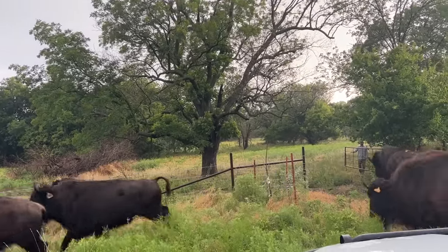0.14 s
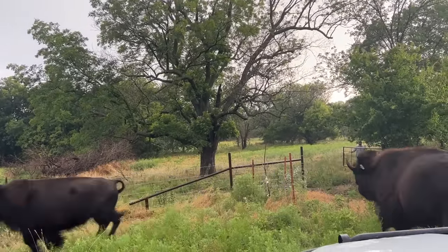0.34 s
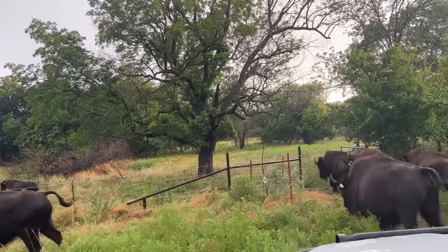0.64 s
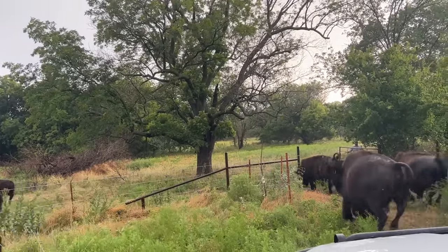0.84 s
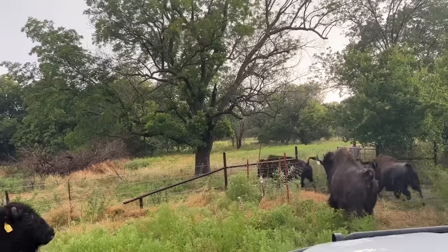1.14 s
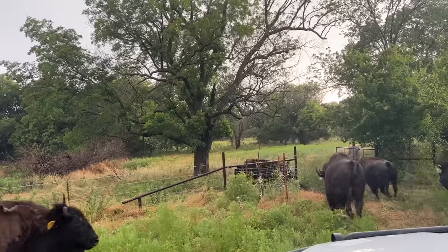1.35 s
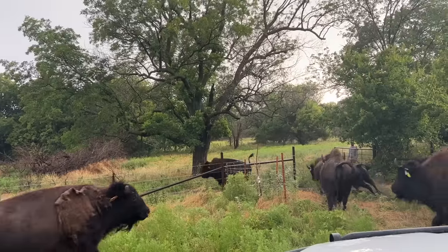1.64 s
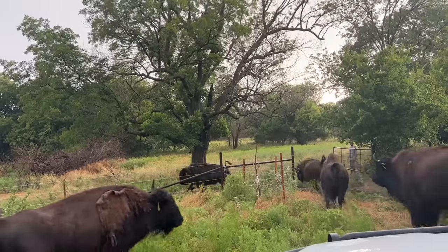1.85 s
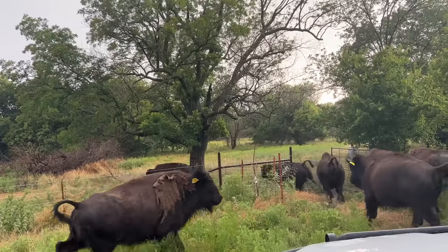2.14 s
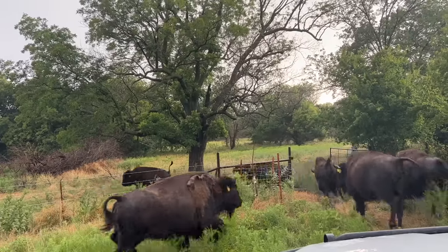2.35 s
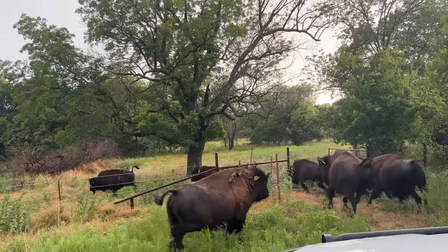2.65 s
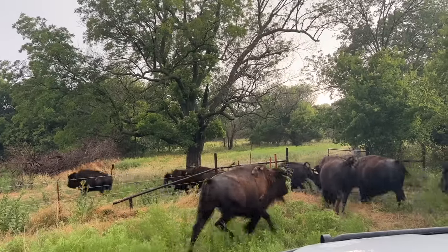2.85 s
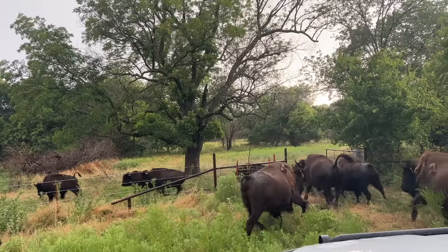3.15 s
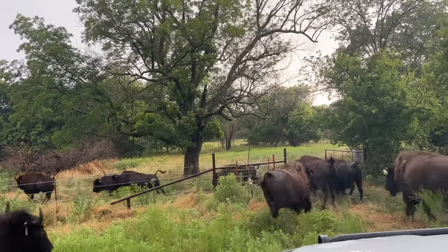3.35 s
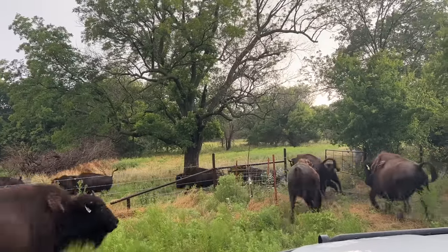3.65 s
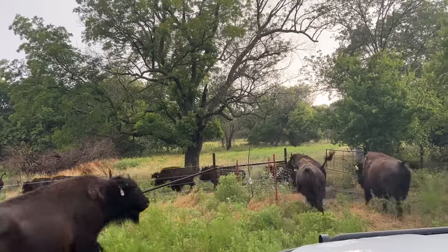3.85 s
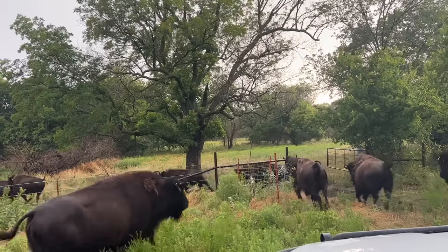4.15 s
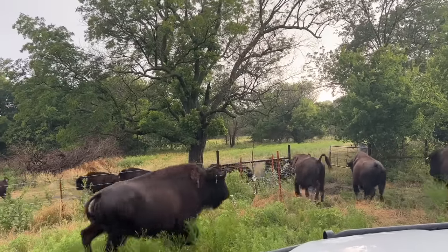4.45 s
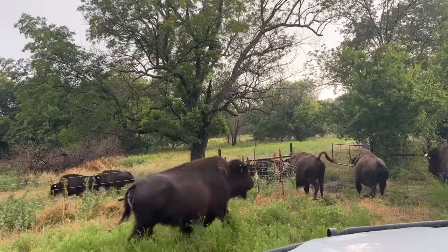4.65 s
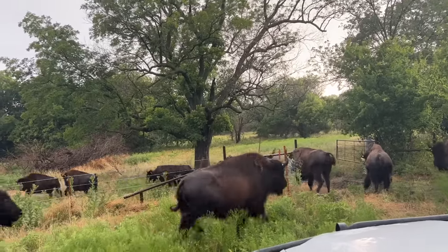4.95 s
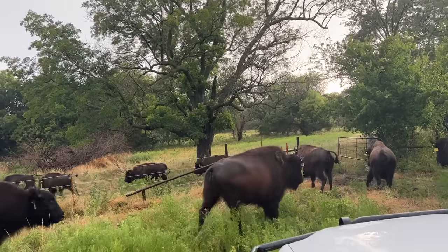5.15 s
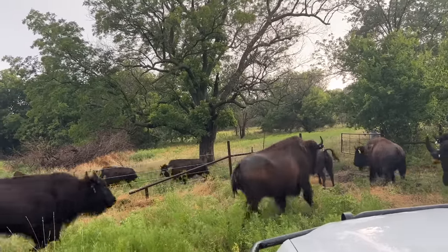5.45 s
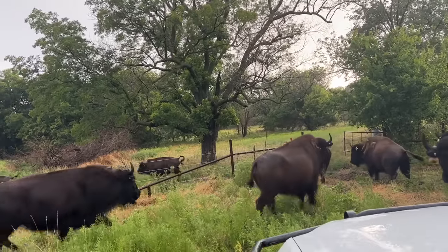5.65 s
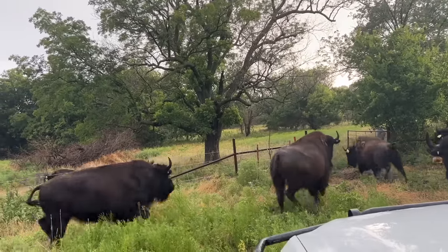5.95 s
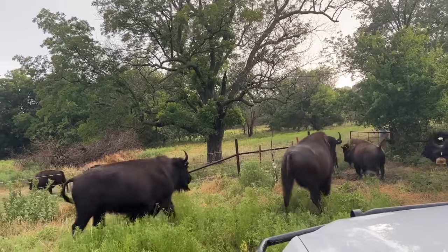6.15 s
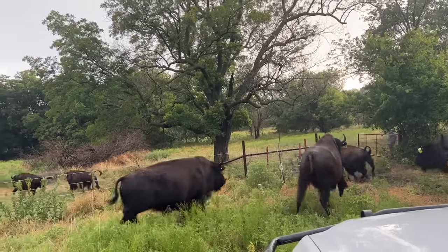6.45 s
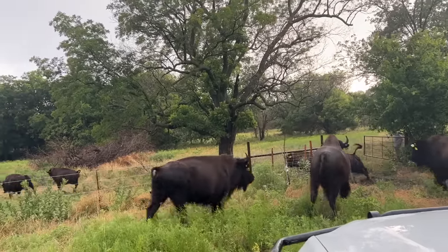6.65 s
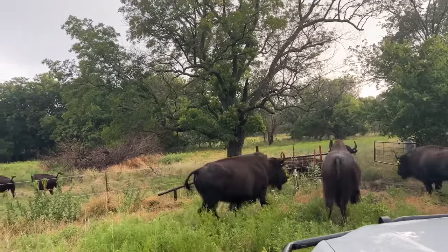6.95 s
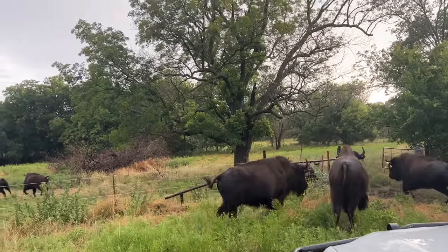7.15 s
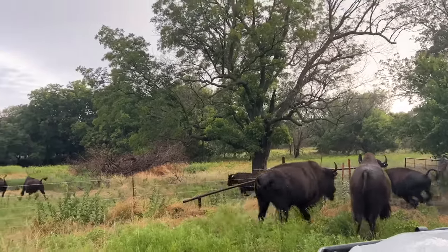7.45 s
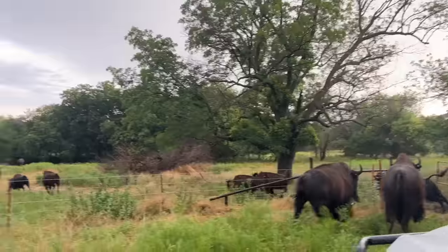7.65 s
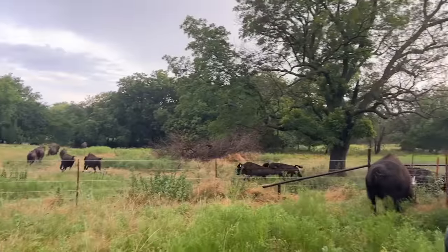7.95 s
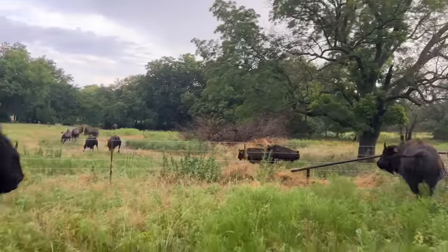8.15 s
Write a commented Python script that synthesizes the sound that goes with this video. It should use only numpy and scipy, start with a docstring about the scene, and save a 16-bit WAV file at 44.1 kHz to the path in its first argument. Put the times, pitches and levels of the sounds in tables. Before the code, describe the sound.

A truck idles throughout with a slightly wavering low hum and rumble, heard from the cab in an open pasture. Around it a bison herd trots through tall grass: fine hissing rustle, crunching dry litter, dull blurred footfalls. A short, rattling, throaty grunt comes almost at once, at 0.1 seconds, and a deeper one at about 1.0, amid soft low thumps like wind or handling. Small ticks and stalk snaps scatter around 1.5 to 2.7. At 3.1 a stronger, more open, raspy grunt lasts 0.4 seconds. A faint, higher one follows at 4.2, then a heavy thump at 4.6. The last grunt, at 5.4, swells and closes into a dull growl among thumps. Two barely audible bird whistles occur at 5.1 and 5.9. Movement thins around 6, with thumps near 6.5; from 7.2 tread and rumble grow closer, with rustles and knocks until 8.3.

```python
"""Five bison grunts, trains of throat pulses ringing a resonant throat, heard from an idling truck's cab.
The herd trots through tall grass: noise for the tread and trampled litter, short noise bursts for
snapping stalks, knocks, swishes and one grunt's rough onset, and a hiss for the grass. Low thumps,
perhaps wind or handling at the microphone, are tones sinking in pitch.
Behind are the engine, wavering idle orders in low rumble, and a bird's two faint gliding whistles."""
import sys
import numpy as np
from scipy import signal
from scipy.fft import rfft, irfft
from scipy.io import wavfile

SR = 44100
rng = np.random.default_rng(int(sys.argv[2]) if len(sys.argv) > 2 else 0)


def dump(signal):
    """Clip the signal to [-1, 1] and save it as 16-bit WAV at the path in sys.argv[1]."""
    limited = np.clip(np.atleast_2d(signal).T, -1, 1)
    pcm = np.round(limited * 32767).astype(np.int16)
    wavfile.write(sys.argv[1], SR, pcm)


N = 366030
T = np.arange(N) / SR
HZ = np.fft.rfftfreq(N, 1 / SR)


def amp(db):
    """Decibels to gain."""
    return 10 ** (np.asarray(db) / 20)


def unit(x):
    """Scales to rms 1."""
    return x / np.sqrt(np.mean(x ** 2) + 1e-20)


def read(points, hz):
    """Joins spectrum points by straight lines on a log-frequency axis."""
    f, value = np.transpose(points)
    return np.interp(np.log(hz + 1), np.log(f), value)


def add(mix, start_s, sound):
    """Mixes a sound in at start_s, cut at the end of the mix."""
    part = mix[..., max(round(start_s * SR), 0):][..., :sound.shape[-1]]
    part += sound[..., :part.shape[-1]]


def drift(rate_hz):
    """Noise low-passed at rate_hz, rms 1: a slow random wander."""
    lowpass = 1 / (1 + (HZ / rate_hz) ** 4)
    return unit(irfft(rfft(rng.standard_normal(N)) * lowpass, N))


def band(x, centre_hz, octaves):
    """Pass band, Gaussian in log frequency."""
    f = np.fft.rfftfreq(x.shape[-1], 1 / SR)
    bell = np.exp(-.5 * (np.log2((f + 1) / centre_hz) / octaves) ** 2)
    return irfft(rfft(x) * bell, x.shape[-1])


def crackle(per_s, range_db, decay_s):
    """Tiny noise bursts at random moments; exponential chance scatters their levels in dB."""
    level_db = range_db * np.minimum(rng.exponential(1, N), 4)
    size = amp(level_db) * (rng.random(N) < per_s / SR)
    power = signal.lfilter([1], [1, -np.exp(-2 / (decay_s * SR))], size ** 2)
    return unit(np.sqrt(power) * rng.standard_normal((2, N)))


# left-right likeness of the microphone pair: f/Hz, correlation [0..1]
LIKENESS_SPECTRUM = [(60, .48), (130, .42), (220, .72), (330, .74), (600, .25), (1200, .2), (4000, .25),
                     (7000, .35), (8800, .97), (9500, 1), (16000, 1)]


def spread(pair, colour_db=0, side_db=0):
    """Colours two unrelated signals and blends them to the pair's likeness; side_db is L-R."""
    a, b = rfft(pair)
    same = np.clip(read(LIKENESS_SPECTRUM, HZ), 0, 1)
    left = a * amp(side_db / 2)
    right = (same * a + np.sqrt(1 - same ** 2) * b) * amp(-side_db / 2)
    return irfft(np.array([left, right]) * amp(colour_db), N)


# part of the left port's lead present at each frequency: f/Hz, share [0..1]
LEAD_SHARE_SPECTRUM = [(250, 0), (700, 1), (1500, 1), (3500, 0)]


def from_outside(x, lead_turns, body_db, top_db):
    """Sound entering the cab reaches the two ports out of step and unequally loud (R-L dB)."""
    f = np.fft.rfftfreq(x.shape[-1], 1 / SR)
    side = np.array([[-.5], [.5]])
    right_db = read([(200, 0), (700, body_db), (1300, top_db), (4000, 0)], f)
    turns = lead_turns * read(LEAD_SHARE_SPECTRUM, f)
    return irfft(rfft(x) * amp(side * right_db) * np.exp(-2j * np.pi * side * turns), x.shape[-1])


# far whistles: t/s, length/s, peak level/dB, start f/Hz, end f/Hz
BIRD_WHISTLES = [(5.125, 0.094, -52, 3160, 3060), (5.942, .09, -51, 1970, 2150)]


def bird():
    """Thin whistles: sines gliding linearly in pitch."""
    out = np.zeros(N)
    for start_s, length_s, db, start_hz, end_hz in BIRD_WHISTLES:
        pitch_hz = np.linspace(start_hz, end_hz, round(length_s * SR))
        tone = np.sin(2 * np.pi * np.cumsum(pitch_hz) / SR)
        add(out, start_s, amp(db) * signal.windows.tukey(len(tone), .6) * tone)
    return out


APPROACH_S, APPROACH_DB_PER_S = 7.22, 5


def approach():
    """Growing gain of tread and rumble as one animal walks up to the truck."""
    return amp(APPROACH_DB_PER_S * np.maximum(T - APPROACH_S, 0))


CYCLE_HZ = 7.625  # four-stroke cycle
# idle lines: multiple of CYCLE_HZ, mean sine amplitude/dB
ENGINE_ORDERS = [(8, -34), (10, -31.5), (11, -39), (12, -38.5), (14, -39), (22, -39.5), (30, -52.5)]
# rumble colour: f/Hz, relative level/dB
RUMBLE_SPECTRUM = [(15, -40), (30, -15.5), (45, -2.5), (62, -3.5), (85, 0.5), (112, -10), (160, -8.5),
                   (200, -13), (300, -17.5), (450, -27), (800, -42), (2000, -63)]


def engine(wander=0.00339, waver_db=0.54, rumble_db=-30.0, swell_db=2.0, fade_db_per_s=0.11,
           throb=0.061, port_turns=0.021):
    """Wavering idle orders in a bed of low rumble that throbs once a crankshaft turn."""
    cycles = np.cumsum(CYCLE_HZ * (1 + wander * drift(1.57))) / SR
    lag = np.array([[0], [port_turns]])  # the cab's sound field puts the ports out of step
    lines = np.zeros((2, N))
    for order, db in ENGINE_ORDERS:
        level = amp(db + waver_db * drift(12.0))
        lines += level * np.sin(2 * np.pi * (order * cycles + rng.random() + lag))
    rumble = unit(spread(rng.standard_normal((2, N)), read(RUMBLE_SPECTRUM, HZ)))
    level_db = rumble_db - fade_db_per_s * T + swell_db * drift(3.1)
    crank_throb = 1 + throb * np.sin(4 * np.pi * cycles)  # two crank turns a cycle
    return lines + amp(level_db) * approach() * rumble * crank_throb


# low thumps: t/s, envelope peak level/dB, start f/Hz, rise to peak/s, left port lead/turns
LOW_THUMPS = [(0.128, -21.5, 213, 0.036, 0), (0.388, -19.5, 200, 0.022, 0),
              (0.881, -19.5, 330, 0.014, -.05), (0.907, -8, 200, 0.012, -.11),
              (1.079, -14.5, 140, 0.01, 0.0022), (1.225, -14, 165, 0.012, -0.0027),
              (1.584, -13, 180, 0.011, -.08), (1.63, -15, 120, 0.012, -0.025),
              (1.675, -22.5, 240, 0.022, 0), (1.868, -18, 191, 0.027, -0.07),
              (2.42, -23, 190, 0.032, -0.052), (2.525, -19.5, 130, .012, -0.058),
              (2.645, -17.5, 188, 0.01, 0.13), (2.68, -19.5, 198, .01, 0.026),
              (3.331, -18.5, 120, 0.015, 0), (4.616, -8.5, 142, 0.008, -.09), (5.427, -17.5, 156, 0.014, 0),
              (5.483, -12, 207, 0.011, 0.13), (5.584, -13.5, 160, 0.016, -0.025),
              (5.638, -10.5, 140, 0.0083, -0.045), (6.436, -10, 171, 0.02, -0.18),
              (6.515, -12.5, 171, 0.01, 0.35), (6.6, -20.5, 240, 0.014, 0), (6.664, -14, 199, 0.021, -0.17),
              (6.74, -21, 252, 0.0056, -0.037), (7.241, -23, 225, 0.021, 0), (7.72, -24, 203, 0.019, 0),
              (7.94, -19, 198, 0.017, 0), (8.112, -15, 140, 0.0074, 0.23), (8.243, -14, 267, 0.0098, 0),
              (8.279, -27, 486, 0.0098, 0)]


def thumps(sag=0.25, sag_s=0.013, shudder_db=-18.0, shudder_hz=48, shudder_octaves=0.48, shudder_s=0.029):
    """Low thumps, perhaps wind or handling: tones sinking toward sag times start pitch, plus a shudder."""
    out, shake, t = np.zeros((2, N)), np.zeros(N), T[:SR // 5]
    for at_s, db, hz, rise_s, lead_turns in LOW_THUMPS:
        pitch_hz = hz * (sag + (1 - sag) * np.exp(-t / sag_s))
        swell = (t / rise_s * np.exp(1 - t / rise_s)) ** 2
        turns = np.cumsum(pitch_hz) / SR + lead_turns * np.array([[.5], [-.5]])
        add(out, at_s, amp(db) * swell * np.sin(2 * np.pi * turns))
        add(shake, at_s, amp(db + shudder_db) * t / shudder_s * np.exp(1 - t / shudder_s))
    deep = unit(spread(band(rng.standard_normal((2, N)), shudder_hz, shudder_octaves)))
    return out + shake * deep


STRIDE_HZ, STRIDE_AT_S = 2.81, 4.98
# herd bustle, thinning to one steady walker before more animals come:
# t/s, rustle level/dB before grass() gain, trampling level/dB before trampling() gain,
# crispness of rustle top/dB, swell per stride/dB (negative: dip)
HERD_BUSTLE = [(0, -45.5, -46, 1, 1.5), (2.35, -45.5, -45.5, 0.5, -1.6), (2.65, -46.5, -43.5, 2, .5),
               (3.2, -47.5, -45.5, -0.5, 1.2), (4.3, -46.5, -47, 1, 0.5), (5.2, -49, -49.5, -0.5, 1.5),
               (5.75, -49, -49.5, -1, 0.5), (6.3, -50, -48.5, -1.5, 0.5), (7, -48, -48, -1, -0.5),
               (7.6, -46, -47.5, 1, 1), (8.3, -48, -45, 2.5, -2.3)]


def herd_level(column, stride_share):
    """Gain from the bustle of the herd, swelling or dipping at each stride."""
    rows = np.array(HERD_BUSTLE)
    stride = np.cos(2 * np.pi * STRIDE_HZ * (T - STRIDE_AT_S))
    stride_db = np.interp(T, rows[:, 0], rows[:, 4]) * stride
    return amp(np.interp(T, rows[:, 0], rows[:, column]) + stride_share * stride_db)


# rustle colour: f/Hz, relative level/dB
RUSTLE_SPECTRUM = [(500, -20), (2000, -6), (3500, -3), (5000, -1.5), (6500, -1.5), (8000, -1.5),
                   (10000, -2), (11300, -1), (13000, -4), (16000, -5)]
# grass and stalk balance: f/Hz, L-R level/dB
GRASS_BALANCE = [(1500, 0), (4400, 4.5), (6000, 4.5), (8000, 2), (9200, 0)]
# top of the rustle: f/Hz, share taken by the crispness gain [0..1]
CRISP_SPECTRUM = [(6500, 0), (12000, 1)]


def grass(gain_db=6, grain=0.52, flicker_db=1.6):
    """Blades brush passing bodies: a fine hiss with tiny ticks and a top of varying crispness."""
    ticks = crackle(per_s=190, range_db=-0.5, decay_s=0.00095)
    hiss = rng.standard_normal((2, N)) + grain * ticks
    hiss = unit(spread(hiss, read(RUSTLE_SPECTRUM, HZ), read(GRASS_BALANCE, HZ)))
    top = irfft(rfft(hiss) * read(CRISP_SPECTRUM, HZ), N)
    rows = np.array(HERD_BUSTLE)
    crisp_db = np.interp(T, rows[:, 0], rows[:, 3])
    hiss = hiss - top + top * amp(crisp_db)
    return amp(gain_db + flicker_db * drift(17.8)) * herd_level(column=1, stride_share=1) * hiss


# litter colour: f/Hz, relative level/dB
TRAMPLE_SPECTRUM = [(150, -41), (400, -0.5), (650, 7.5), (900, 5), (1400, 2.5), (2500, 0.5), (4000, -10.5),
                    (8000, -9.5), (16000, -9.5)]


def trampling(gain_db=4, grain=0.76, flicker_db=1.36, lead_turns=0.18, right_db=3):
    """Hooves crush dry litter: a noise wash with small crunches in it."""
    crunches = crackle(per_s=90, range_db=2.0, decay_s=0.0041)
    wash = rng.standard_normal((2, N)) + grain * crunches
    wash = unit(spread(wash, read(TRAMPLE_SPECTRUM, HZ)))
    wash = from_outside(wash, lead_turns, right_db, 0)
    return amp(gain_db + flicker_db * drift(12.5)) * herd_level(column=2, stride_share=0.15) * wash


# patter swells: spread in time, level against the thump or swish
PATTER_SWELL_S, THUMP_PATTER_DB, SWISH_PATTER_DB = 0.14, -38.5, -4.5


def tread(floor_db=-45.0, centre_hz=430, octaves=1.0):
    """Footfalls blur into a dull noise patter on soil, louder around each low thump and swish."""
    patter = rng.standard_normal((2, N)) + 0.54 * crackle(per_s=21, range_db=3.5, decay_s=0.018)
    swells = [(at_s, db + THUMP_PATTER_DB) for at_s, db, *_ in LOW_THUMPS]
    swells += [(mid_s, db + SWISH_PATTER_DB) for mid_s, _, db, *_ in LEG_SWISHES]
    power = amp(floor_db) ** 2
    for at_s, db in swells:
        power = power + amp(db) ** 2 * np.exp(-((T - at_s) / PATTER_SWELL_S) ** 2)
    return np.sqrt(power) * approach() * unit(spread(band(patter, centre_hz, octaves)))


# short noise bursts: stalk snaps, knocks, and the rough onset of the third grunt:
# t/s, peak level/dB before spread(), centre f/Hz, width/octaves, decay/s
NOISE_BURSTS = [(1.542, -23.5, 6000, 1, 0.026), (1.697, -19.5, 620, 0.8, 0.0051),
                (2.035, -26, 1750, 0.71, 0.0044), (2.061, -29, 2800, 0.5, .004),
                (2.116, -21, 2500, 0.18, 0.0033), (2.133, -22.5, 1140, 0.64, 0.0054),
                (2.179, -14.5, 11000, 0.34, .0013), (2.260, -10, 10500, 0.38, 0.001),
                (2.497, -26.5, 2200, 0.68, 0.0099), (2.557, -27, 1500, 0.8, 0.0033),
                (2.668, -26, 1900, .6, .005), (3.072, -26.5, 1900, 0.64, 0.0034),
                (3.084, -22, 1200, 0.76, .002), (3.16, -17.5, 1800, 0.51, 0.0037),
                (3.449, -22, 11000, 0.81, .005), (3.483, -21, 10000, 0.3, .01),
                (3.678, -16.5, 6500, 1, 0.0037), (3.694, -14, 3800, .62, 0.0009),
                (3.86, -19.5, 8000, 0.47, .002), (4.228, -20, 5670, 0.96, 0.0051),
                (4.287, -26, 10000, 1, 0.059), (5.631, -33, 4900, 0.14, 0.0027),
                (7.071, -19, 8000, 0.68, 0.0022), (7.168, -27, 13500, .3, .002),
                (7.232, -25, 4340, 0.28, 0.0072), (7.236, -17.5, 9000, 1, 0.005),
                (8.063, -19.5, 7950, 1, 0.03), (8.239, -26, 660, 0.35, 0.011), (8.238, -24, 4500, 1, 0.018),
                (8.277, -17.5, 500, 0.28, 0.018), (8.275, -23, 4000, 1, 0.0071)]
# legs through grass: middle t/s, length/s, rms level/dB before fades and spread(), centre f/Hz, width/octaves
LEG_SWISHES = [(0.301, 0.2, -45, 5500, 0.55), (0.503, 0.18, -41, 5270, 0.64),
               (3.624, 0.083, -39, 5800, 0.31), (3.665, 0.11, -46, 4300, 0.71),
               (4.272, 0.2, -41, 6500, 0.82), (5.37, .1, -47, 4200, 0.27), (5.928, 0.059, -44.5, 6000, .12),
               (6.564, 0.36, -47, 5860, 0.38), (6.885, 0.23, -48, 5970, 0.35), (7.25, .13, -47, 5200, 0.46),
               (7.51, 0.12, -44, 6250, 0.38), (7.701, 0.34, -46, 6600, 0.46)]


def bursts_and_swishes():
    """Band-passed noise: decaying bursts for snaps, knocks and a grunt's onset; longer leg swishes."""
    out = np.zeros((2, N))
    t = T[:SR // 10] - .005  # lead-in for the filter's pre-ring
    for at_s, db, hz, octaves, decay_s in NOISE_BURSTS:
        envelope = np.exp(-abs(t) / decay_s) * (t > 0)
        burst = band(rng.standard_normal((2, len(t))) * envelope, hz, octaves)
        add(out, at_s + t[0], amp(db) * burst / abs(burst).max())
    for mid_s, length_s, db, hz, octaves in LEG_SWISHES:
        noise = unit(band(rng.standard_normal((2, SR)), hz, octaves))
        swish = noise[:, :round(length_s * SR)]
        add(out, mid_s - length_s / 2, amp(db) * swish * signal.windows.tukey(swish.shape[1], .7))
    return spread(out, side_db=read(GRASS_BALANCE, HZ))


def throat(modes, size=4096):
    """Minimum-phase (causal) ring of one pulse in a throat with steep resonances, peak 1."""
    f = abs(np.fft.fftfreq(size, 1 / SR))
    gain = sum(amp(db) / (1 + (1.56 * (f - hz) / width) ** 2) ** 2 for hz, width, db in modes)
    log_gain = np.log(gain + amp(-46))
    ring = np.fft.ifft(np.exp(np.conj(signal.hilbert(log_gain)))).real[:size // 2]
    return ring / abs(ring).max()


SPLIT_HZ = 950  # throat's body below, top above
RASP, START_RASP, START_S, CLOSURE_S = .022, .04, .05, .003  # air share, extra at onset, its decay, pulse decay
HISS, HISS_HZ, HISS_OCTAVES, HISS_S = .13, 4800, .45, .004  # share, centre, width, decay
AIRFLOW_DB = -44  # air between pulses, against effort
# chest boom under every grunt: f/Hz, width/Hz, level/dB
CHEST_MODE = (135, 150, 4)


def grunt(rows, modes, uneven_db=0.6, wobble=0.006, damping=0.1):
    """Slack vocal folds slap; each slap and its rasp of air ring a throat that keeps changing shape."""
    s, rate_hz, effort_db, mouth_db, stretch, limp_db = np.transpose(rows)
    t = np.arange(s[0], s[-1] + 0.042, 1 / SR)
    turns = np.cumsum(np.interp(t, s, rate_hz)) / SR
    slaps_s = t[(np.diff(np.floor(turns), prepend=-1) > 0) & (t < s[-1])]
    airflow = amp(np.interp(t, s, effort_db) + AIRFLOW_DB) * np.interp(t, [s[-1], t[-1]], [1, 0])
    breath = airflow * rng.standard_normal(len(t))
    voice = signal.fftconvolve(breath, throat(modes + [CHEST_MODE]))[:len(t)]
    u = T[:SR // 50]
    for k, at_s in enumerate(slaps_s):
        strength, shape, loss = rng.standard_normal(3)
        pitch = np.interp(at_s, s, stretch) + wobble * shape
        now = [(hz * pitch if hz > SPLIT_HZ else hz, width * np.exp(damping * loss), db)
               for hz, width, db in modes]
        rasp = RASP + START_RASP * np.exp((s[0] - at_s) / START_S)
        puff = (u == 0) + rasp * np.exp(-u / CLOSURE_S) * rng.standard_normal(len(u))
        hiss = HISS * np.exp(-u / HISS_S) * band(rng.standard_normal(len(u)), HISS_HZ, HISS_OCTAVES)
        pulse = puff / np.linalg.norm(puff) + hiss
        db = np.interp(at_s, s, effort_db - k % 2 * limp_db) + uneven_db * strength
        add(voice, at_s - s[0], amp(db) * signal.fftconvolve(pulse, throat(now + [CHEST_MODE])))
    low = signal.sosfiltfilt(signal.butter(4, SPLIT_HZ, fs=SR, output="sos"), voice)
    return s[0], low + (voice - low) * amp(np.interp(t, s, mouth_db))  # a closing mouth dulls the top


# one list a grunt: t/s, pulse rate/Hz, effort level/dB, mouth opening as gain above SPLIT_HZ/dB,
# stretch of resonances above SPLIT_HZ [ratio], drop of every second pulse/dB
GRUNT_TRACKS = [
    [(.072, 32.6, -29, -1.5, 1, 0), (.135, 36.8, -19, 0, 1, 0), (.185, 45.7, -20.5, .5, .99, 0),
     (.225, 44.8, -24.5, 1, .99, 0), (.248, 44.3, -19, 2.5, 1.02, 0), (.27, 45.3, -37, 2, 1, 0),
     (.32, 46.6, -35, 2, 1, 0)],
    [(.958, 29.7, -23.5, 1, .99, 0), (1.055, 33.7, -18.5, 6, 1, 0), (1.085, 34.9, -19, -1.5, 1, 0),
     (1.135, 36.9, -16, -2.5, 1.01, 0), (1.17, 35.5, -20, -3.5, 1, 0), (1.2, 34.3, -21.5, -6, 1, 0),
     (1.23, 33, -21.5, 3, 1, 0), (1.32, 33, -30, 0, .99, 0)],
    [(3.06, 28.5, -28, 9, .98, 0), (3.095, 30.1, -20.5, 8.5, .98, 0), (3.185, 34.2, -13.5, 8.5, 1, 0),
     (3.3, 35.1, -17.5, 6, .995, 0), (3.365, 34.8, -16, 7.5, .985, 0), (3.465, 29.7, -18.5, 5.5, .985, 0)],
    [(4.1685, 42.8, -35, 5, 1, 0), (4.28, 47.6, -28, 4.5, 1, 0), (4.33, 44.1, -34.5, 4.5, 1, 0),
     (4.37, 45.3, -32, 4.5, 1, 0), (4.4, 46.2, -39, 4.5, 1, 0)],
    [(5.4423, 32.1, -31, 2, 1.03, 0), (5.472, 33.9, -22, 0, 1.03, 0), (5.5, 35.5, -16, .5, 1.015, 0),
     (5.53, 37, -15, -1.5, .965, 0), (5.555, 38.3, -13.5, .5, .96, 0), (5.58, 43.5, -15, -5.5, .94, 10),
     (5.65, 44.4, -17.5, -12, .94, 7), (5.725, 43.9, -22.5, -13, .94, 5)],
]
# one list of resonances a grunt: f/Hz, width/Hz, level/dB
THROAT_MODES = [
    [(320, 120, 2), (1120, 480, -1.5), (1325, 160, 5), (1690, 170, -3), (5200, 450, -13)],
    [(420, 300, -13), (712, 130, 3), (1345, 220, -5)],
    [(350, 400, 2.5), (720, 160, 2.5), (1220, 500, -6), (1435, 130, .5), (5900, 600, -22)],
    [(1200, 260, -4.5), (1510, 170, 0), (1670, 150, -3.5), (4920, 350, -11)],
    [(480, 380, -2.5), (710, 190, -1.5), (1290, 280, -1.5), (1440, 140, 3.5), (3350, 220, -23),
     (4450, 400, -27), (5100, 500, -24.5)],
]
# one row a grunt: left port lead/turns, R-L body level/dB, R-L top level/dB
GRUNT_PLACES = [(.14, 1, 1), (.32, 6, -3), (.12, 2, 3), (.11, 0, 2), (.21, 2.5, 2)]


def bison(scatter_db=-10.0, t60_s=0.21):
    """Grunts with short scattered echoes off ground and truck: decaying noise as the echo response."""
    dry = np.zeros((2, N))
    for rows, modes, place in zip(GRUNT_TRACKS, THROAT_MODES, GRUNT_PLACES):
        start_s, voice = grunt(rows, modes)
        add(dry, start_s, from_outside(voice, *place))
    t = T[:SR // 4]
    tail = rng.standard_normal((2, len(t))) * amp(-60 * t / t60_s) * (t > .002)
    wet = signal.fftconvolve(dry, tail / np.linalg.norm(tail[0]), axes=1)[:, :N]
    return dry + amp(scatter_db) * wet


def scene():
    """The herd around the idling truck."""
    background = bird() + engine() + thumps()
    return background + grass() + trampling() + tread() + bursts_and_swishes() + bison()


EDGE_HZ = 15800
# left port's lead over the right in the treble: f/Hz, lead/turns
PORT_LEAD_SPECTRUM = [(6500, 0), (8400, .22), (9200, .46), (10900, .54), (11700, .72), (12600, .95),
                      (14200, 1.04), (15300, 1.33)]


def record(dry):
    """Two microphone ports, increasingly out of phase toward the high treble; then the band limit."""
    left, right = rfft(dry)
    right = right * np.exp(-2j * np.pi * read(PORT_LEAD_SPECTRUM, HZ))
    pair = irfft(np.array([left, right]), N)
    lowpass = signal.firwin(511, EDGE_HZ, window=("kaiser", 9), fs=SR)
    return signal.oaconvolve(pair, lowpass[None], "same", axes=1)


dry = scene()
out = record(dry)
dump(out)
```